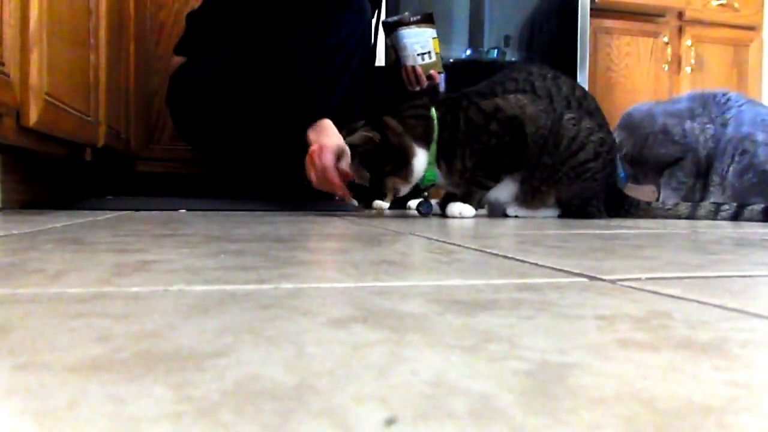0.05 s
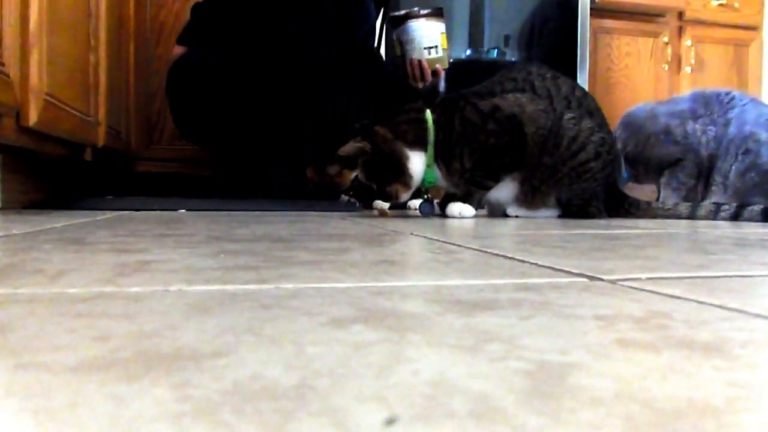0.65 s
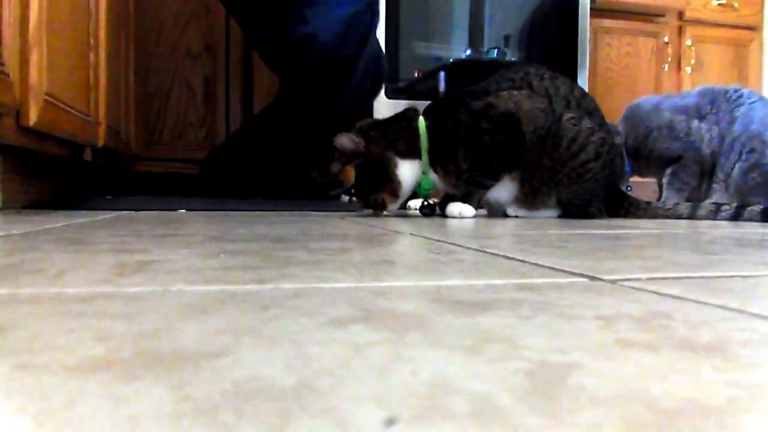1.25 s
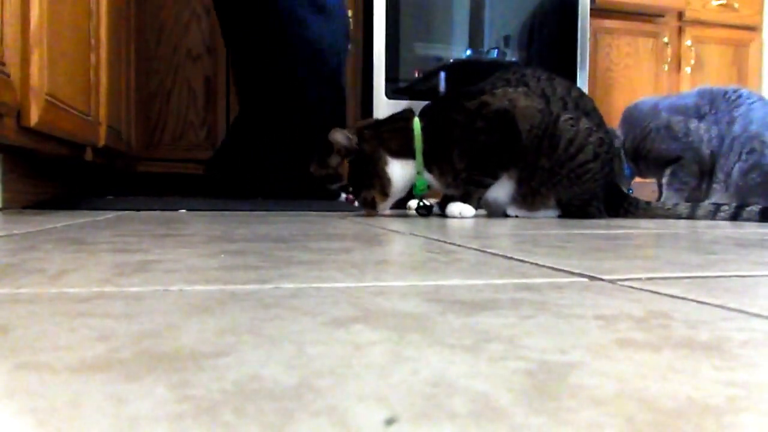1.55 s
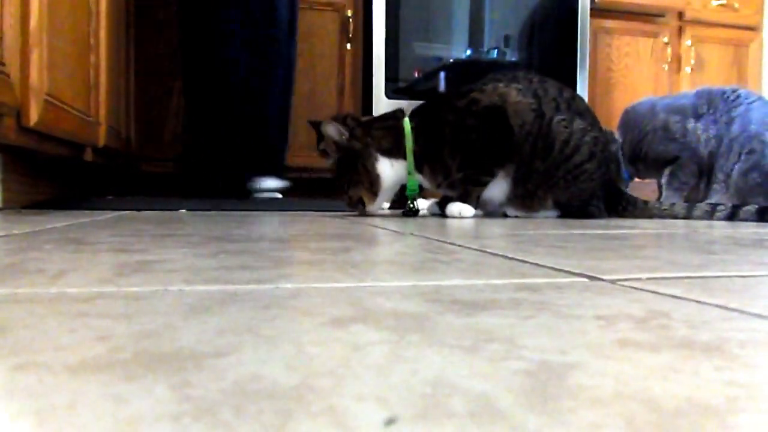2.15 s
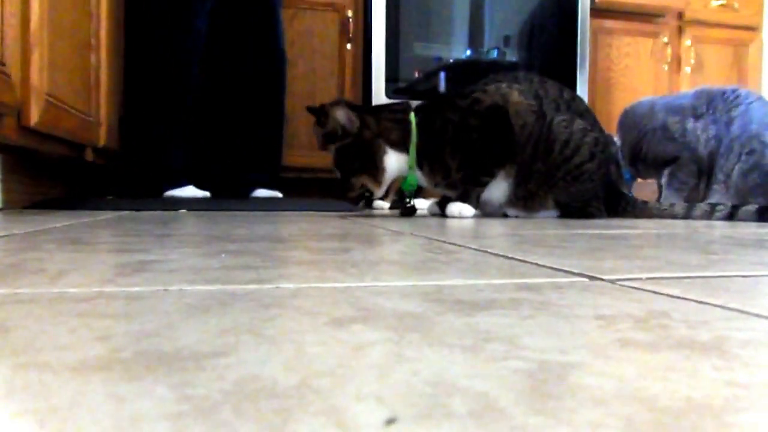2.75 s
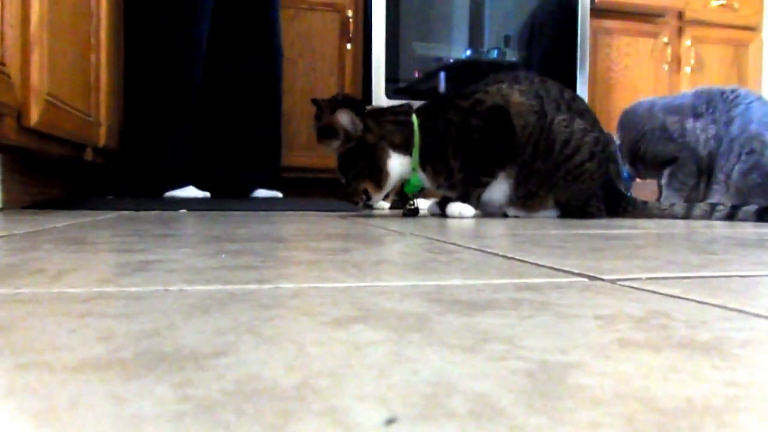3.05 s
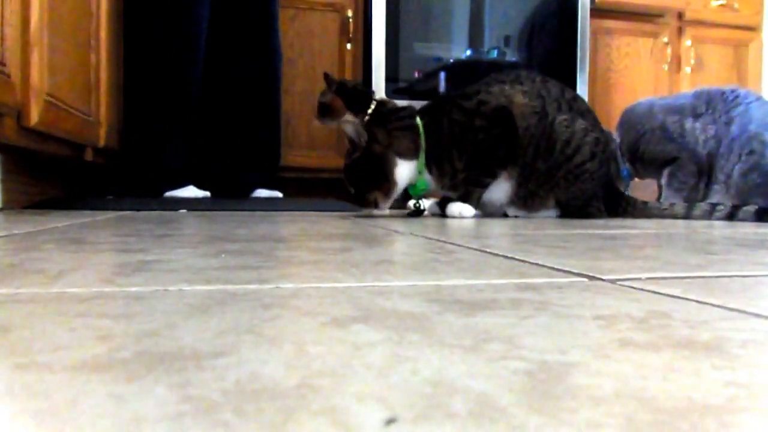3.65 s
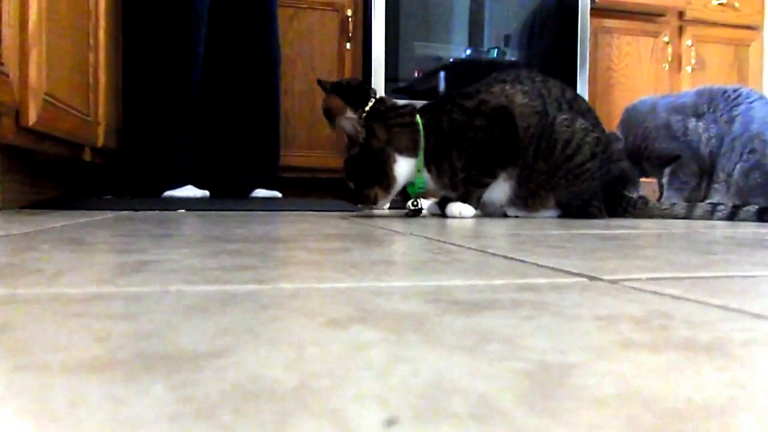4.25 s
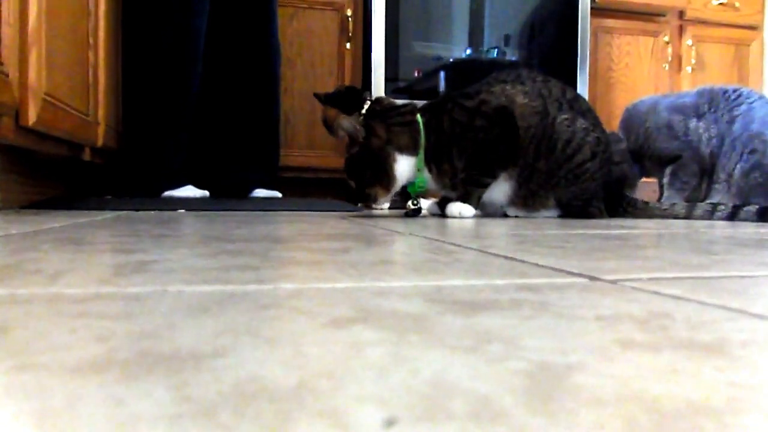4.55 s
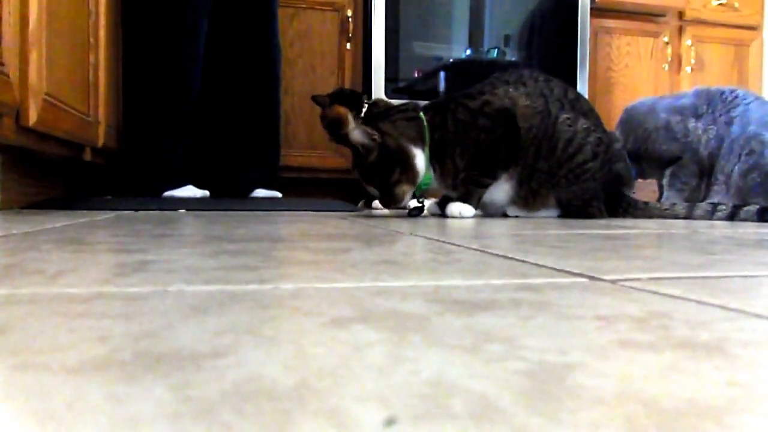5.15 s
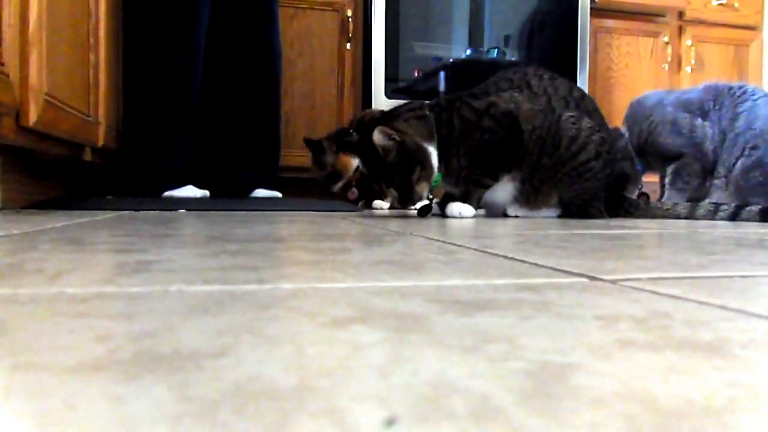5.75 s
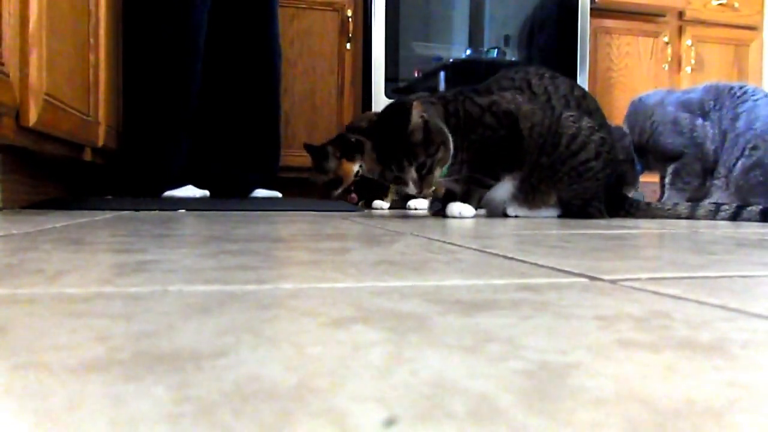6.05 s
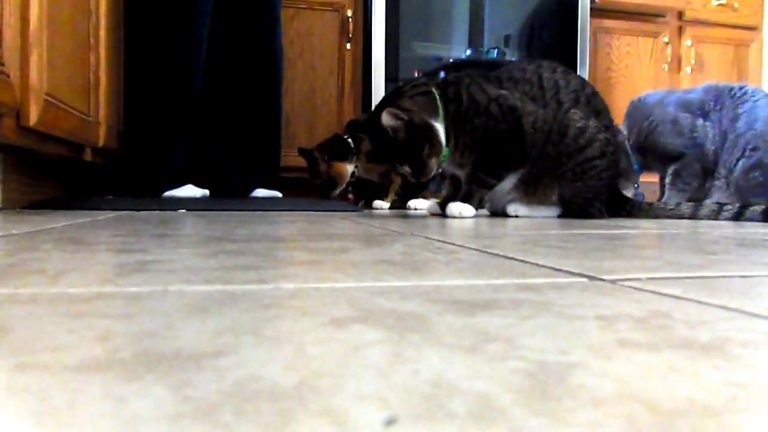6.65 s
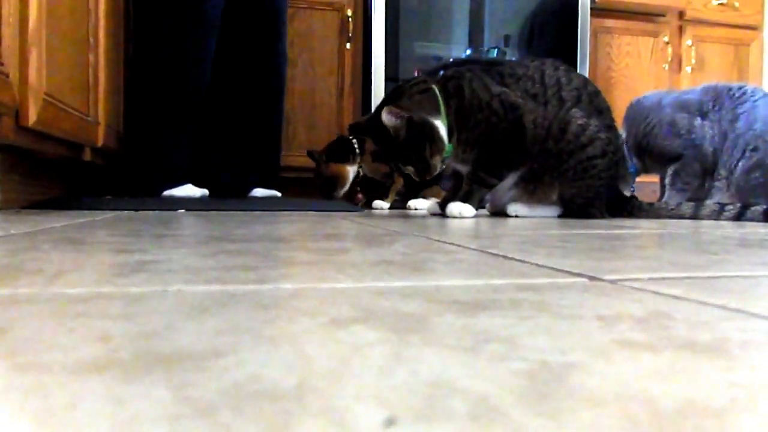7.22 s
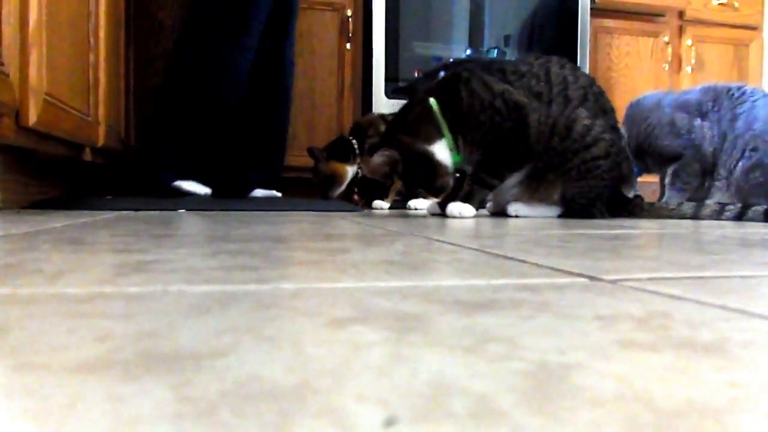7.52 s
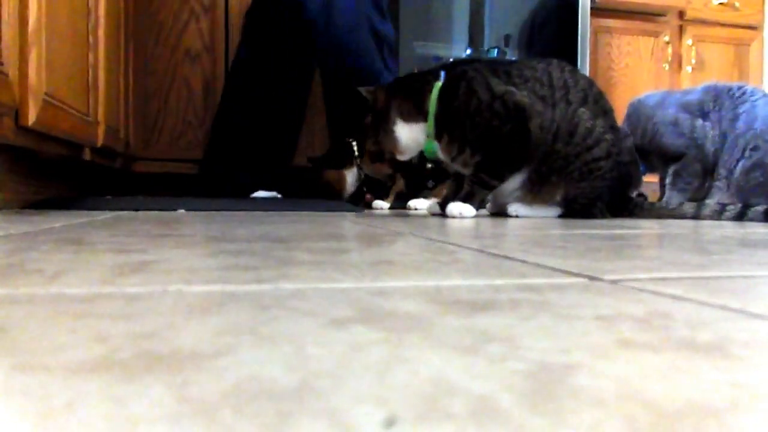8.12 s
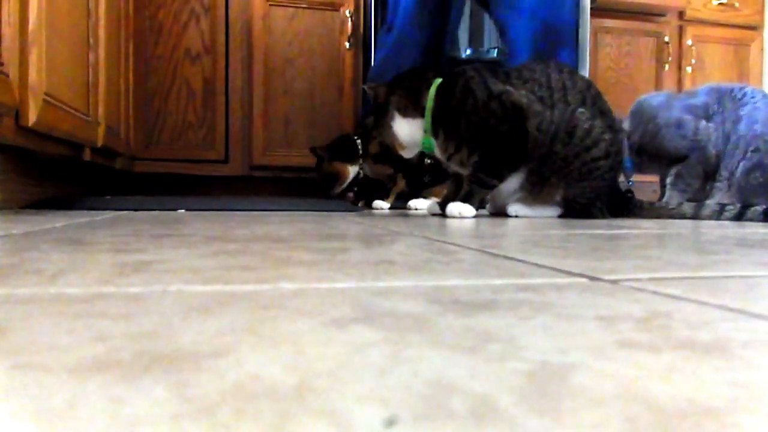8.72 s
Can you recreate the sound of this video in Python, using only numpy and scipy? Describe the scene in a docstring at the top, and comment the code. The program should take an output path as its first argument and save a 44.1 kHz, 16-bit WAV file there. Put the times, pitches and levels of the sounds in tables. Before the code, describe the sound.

A few high, damped clinks from a collar bell open the scene in a quiet kitchen. With one soft, low bump, cats start cracking dry food between their teeth, in uneven runs of brittle snaps and duller chews. The bell clinks lightly here and there, over faint fur rustle and shuffling feet. Everything is heard from a short distance, with a brief echo from the hard room.

```python
"""Cats eating kibble in a kitchen

Cats eat dry kibble off a tiled floor, a metre or two from the microphone. Each nugget
snaps between their teeth, sets jaw and mouth ringing, and echoes in the hard room.
A pellet clinks and rolls in a collar bell, paws and feet shuffle, fur and clothes rustle.
The recorder turns its treble down for a moment after the sharpest cracks."""
import sys
import numpy as np
from scipy import signal
from scipy.fft import rfft, irfft, next_fast_len
from scipy.io import wavfile
from scipy.ndimage import minimum_filter1d

SR = 44100
rng = np.random.default_rng(int(sys.argv[2]) if len(sys.argv) > 2 else 0)


def pcm_store(signal):
    """Save signal as 16-bit PCM."""
    levels = np.round(np.clip(np.atleast_2d(signal), -1, 1) * 32767)
    wavfile.write(sys.argv[1], SR, levels.astype(np.int16).T)


N = 391608
TIME = np.arange(N) / SR


def from_db(db):
    """Turn decibels into a number to multiply a sound by."""
    return 10 ** (np.asarray(db) / 20)


def rms_one(x):
    """Scale a signal so that its average strength (rms) is 1."""
    return x / np.sqrt(np.mean(x ** 2) + 1e-20)


def at_hz(points, hz):
    """Read between the rows of a table, with every octave equally wide."""
    row_hz, value = np.transpose(points)
    return np.interp(np.log(np.maximum(hz, 1)), np.log(row_hz), value)


def butter(x, hz, kind, order=2):
    """Keep the lows, the highs or a band of a sound."""
    return signal.sosfilt(signal.butter(order, hz, kind, fs=SR, output="sos"), x)


def noise(spectrum):
    """Steady noise with the tone colour given in a table, at strength 1."""
    size = next_fast_len(N)
    gain = from_db(at_hz(spectrum, np.fft.rfftfreq(size, 1 / SR)))
    return rms_one(irfft(rfft(rng.standard_normal(size)) * gain, size)[:N])


def drift(per_s):
    """A curve that wanders to a new random value per_s times a second."""
    steps = rng.standard_normal(4000)
    return rms_one(np.interp(TIME * per_s, np.arange(len(steps)), steps))


def swell(s, rise_s):
    """A smooth rise to a peak at time s, and an equal fall."""
    return np.exp(-np.minimum(np.square((TIME - s) / rise_s) * 2, 20))


def resonate(x, hz, width_hz):
    """Ring at one pitch (a resonance); the narrower its width, the longer it rings."""
    decay = np.exp(-np.pi * width_hz / SR)
    angle = 2 * np.pi * min(hz, .45 * SR) / SR
    feedback = [1, -2 * decay * np.cos(angle), decay * decay]
    return signal.lfilter(np.array([1, 0, -1]) * (1 - decay * decay) / 2, feedback, x + 1e-18)


def one_ms_energy(x):
    """Give a short sound the energy of one millisecond at strength 1."""
    return x / np.linalg.norm(x) * np.sqrt(SR / 1000)


def ring_part(force, modes, widen, pitch_spread=0.042, spread_db=3.5):
    """A push rings a group of resonances (modes), a little differently each time."""
    ring = 0
    for k, (hz, width, db) in enumerate(modes):
        pitch = hz * np.exp(pitch_spread * rng.standard_normal())
        gain = from_db(db + spread_db * rng.standard_normal())
        ring += (-1) ** k * gain * resonate(force, pitch, width * widen)
    band_hz = [0.66 * modes[0][0], min(1.38 * modes[-1][0], SR * 4 / 9)]
    return one_ms_energy(butter(ring, band_hz, "band", order=3))


def add(track, s, sound):
    """Mix a sound into a track, starting s seconds in."""
    start = max(round(s * SR), 0)
    track[start:start + len(sound)] += sound[:max(N - start, 0)]


# The colours of the rumble and the hiss. Each row: frequency in Hz, relative level in dB.
RUMBLE_COLOUR = [(20, -1), (60, 0.5), (120, -2.5), (250, -5), (400, -8.5), (800, -19), (2000, -28),
                 (5000, -28), (9000, -43), (16000, -52)]
HISS_COLOUR = [(12500, -27.5), (14200, -8), (15000, 27), (15800, -5), (16500, -24)]
def background(rumble_db=-51.5, hiss_db=-67.5):
    """The room's steady low rumble and a thin, very high hiss."""
    return from_db(rumble_db) * noise(RUMBLE_COLOUR) + from_db(hiss_db) * noise(HISS_COLOUR)


# Paws and feet shifting on the floor. Each row: time in seconds, relative level in dB.
SHUFFLE_LEVELS = [(0, -54.5), (1.3, -54), (1.6, -51), (2.8, -54), (3.9, -53), (4.8, -52.5), (6.1, -55.5),
                  (6.7, -51), (7.4, -58), (8.1, -59.5), (8.8, -53)]
# Brushes of fur and cloth. Each row: middle in seconds, relative dB of bright rustle and of dull scuff.
FUR_BRUSHES = [(0.743, -80, -51.5), (0.898, -64, -58), (1.43, -58, -74), (1.553, -52, -52),
               (2.19, -56.5, -75), (2.47, -57.5, -49.5), (2.985, -56.5, -53), (3.108, -60, -54.5),
               (4.055, -58, -54), (4.716, -72, -46), (4.877, -59, -56.5), (6.598, -61.5, -43),
               (7.06, -58.5, -65), (8.812, -61, -96)]
# The colours of shuffle and rustle. Each row: frequency in Hz, relative level in dB.
SHUFFLE_COLOUR = [(200, -1.5), (450, 2), (900, 1), (1500, -3.5), (2400, -8.5), (4500, -9.5), (6500, -14),
                  (9000, -17)]
RUSTLE_COLOUR = [(2500, -38), (5000, 5), (7500, 0.5), (10000, 2.5), (13000, -5), (16000, 0)]
def movement(shuffle_db=-1.5, rustle_db=-65, brush_db=3.5, scuff_db=-1, grain_db=3.5):
    """Paws and feet shuffle dully; fur and cloth give a grainy rustle that swells in short brushes."""
    shuffle = from_db(np.interp(TIME, *np.transpose(SHUFFLE_LEVELS)) + shuffle_db)
    brushes, scuffs = sum(from_db([[bright], [dull]]) * swell(s, rise_s=0.086)
                          for s, bright, dull in FUR_BRUSHES)
    grain = from_db(grain_db * drift(per_s=300))
    dull = np.hypot(shuffle * from_db(drift(per_s=35)), from_db(scuff_db) * scuffs * grain)
    bright = np.hypot(from_db(rustle_db), from_db(brush_db) * brushes * grain)
    return dull * noise(SHUFFLE_COLOUR) + bright * noise(RUSTLE_COLOUR)


# The collar swings as the head moves. Each row: start and end in seconds, pitch in Hz, relative dB.
COLLAR_SWINGS = [(0.026, 0.52, 5430, -43), (0.146, 1.1, 4420, -48), (6.764, 7.12, 5480, -56),
                 (7.8, 8.717, 5700, -50)]
def light_touches(clinks, per_swing=7, bounce_s=0.016, bounce_loss_db=14, shine_db=-22):
    """List fainter clinks: the pellet bounces after each clear one and grazes the bell in each swing."""
    touches = [(s + bounce_s, hz, db - bounce_loss_db, shine_db) for s, hz, db, _ in clinks]
    for start, end, hz, db in COLLAR_SWINGS:
        for k in range(per_swing):
            s = start + (end - start) * (k + rng.random()) / per_swing
            pitch = hz * np.exp(0.033 * rng.standard_normal())
            touches.append((s, pitch, db + 4 * rng.standard_normal(), shine_db))
    return touches


# Clear clinks. Each row: start in seconds, pitch in Hz, relative level in dB, dB of shine on top.
BELL_CLINKS = [(0.025, 4365, -23, -3), (0.258, 5820, -37, -15), (0.308, 4330, -41, 11.5),
               (0.697, 4350, -33, -8.5), (0.941, 4300, -43.5, -19.5), (1.808, 5080, -43, -19),
               (2.474, 5105, -36.5, -2), (2.55, 5100, -47, -22), (4.049, 5900, -40, -22),
               (6.872, 5810, -43, -26), (7.408, 5150, -40.5, -31), (8.011, 5830, -45, -27)]
# The bell's own notes. Each row: pitch in Hz, relative level of the lasting ring in dB.
BELL_MODES = [(4330, -42), (5080, 2), (5800, -27)]
# Its overtones. Each row: pitch in Hz, relative level in dB, seconds to fade by 60 dB (called t60).
BELL_OVERTONES = [(10240, -9.5, 0.084), (10600, -22, .04), (12160, -34, 0.073), (15700, 2, .016)]
def collar_bell(damped_t60=0.024, ring_t60=0.059, touch_s=0.00027, tick_db=-9, tick_s=0.0048, gain_db=1):
    """The pellet strikes the bell with a tick; fur damps most of the note and a faint ring stays."""
    t, out = TIME[:SR // 4], np.zeros(N)
    onset = 1 - np.exp(-t / touch_s)

    def tone(hz, t60):
        return np.sin(2 * np.pi * (hz * t + rng.random())) * from_db(-60 * t / t60)

    for s, hz, level_db, shine_db in BELL_CLINKS + light_touches(BELL_CLINKS):
        note = tone(hz * (1 + 0.0042 * rng.standard_normal()), damped_t60)
        ring = from_db(at_hz(BELL_MODES, hz)) * tone(hz, ring_t60)
        tick = from_db(tick_db) * butter(rng.standard_normal(len(t)), 4900, "high") * np.exp(-t / tick_s)
        shine = tick + sum(from_db(db) * tone(f, t60) for f, db, t60 in BELL_OVERTONES)
        add(out, s, from_db(level_db) * (note + ring + from_db(shine_db) * shine) * onset)
    return from_db(gain_db) * out


# Rolls inside the bell. Each row: middle in seconds, rise time in seconds, relative level in dB.
PELLET_ROLLS = [(0.176, 0.027, -54.5), (0.294, 0.098, -54.5), (2.504, 0.052, -59)]
def rolling_pellet(taps_per_s=500, width_hz=170, overtone_db=-5, gain_db=6):
    """The rolling pellet taps the bell's shell hundreds of times a second."""
    taps = (rng.random(N) < taps_per_s / SR) * rng.standard_normal(N)
    shell = sum(from_db(db / 4) * resonate(taps, hz, width_hz) for hz, db in BELL_MODES)
    overtone = resonate(taps, BELL_OVERTONES[2][0], width_hz) / np.std(shell) / 2
    ring = butter(rms_one(shell) + from_db(overtone_db) * overtone, 4300, "high")
    return ring * sum(from_db(db + gain_db) * swell(s, rise_s) for s, rise_s, db in PELLET_ROLLS)


# Resonances of the mouth, the nugget's snap and its brighter crack.
# Each row: pitch in Hz, width in Hz, relative level in dB.
MOUTH_MODES = [(940, 426, -1.5), (1390, 440, 0), (1940, 960, -6.5)]
SNAP_MODES = [(2730, 1360, -5.5), (3680, 1080, -1.5), (5120, 1030, 3.5), (6240, 1120, -5.5)]
CRACK_MODES = [(8390, 2260, 0), (10540, 1260, -0.5), (12500, 5300, -6.5), (15640, 1000, -9.5)]
def chewing(per_s=14, level_db=-34, spread_db=4):
    """Tiny crumbs and wet ticks of the tongue come at random moments."""
    ticks = (rng.random(N) < per_s / SR) * from_db(spread_db * np.clip(rng.standard_normal(N), -2, 1.5))
    skipped = rng.integers(0, 3, N)  # each tick rings two of the three groups
    return from_db(level_db) * sum(from_db(db) * resonate(ticks * (skipped != k), hz, width)
                                   for k, modes in enumerate((MOUTH_MODES, SNAP_MODES, CRACK_MODES))
                                   for hz, width, db in modes)


SOFT_RUN_S, BRITTLE_RUN_S = 0.0012, 0.00018  # how long a crack takes to run through a nugget
def fracture(t, run_s, crumbs_per_s=330, crumb_db=-15, crumble_s=0.023):
    """A crack runs through a nugget and a few crumbs break after it. Returns both."""
    crack = rng.standard_normal(len(t)) * np.exp(-t / run_s)
    crumbs = (rng.random(len(t)) < crumbs_per_s / SR) * rng.standard_normal(len(t))
    return crack / np.linalg.norm(crack), from_db(crumb_db) * crumbs * np.exp(-t / crumble_s)


# Resonances of a low thud. Each row: pitch in Hz, width in Hz, relative level in dB.
THUD_MODES = [(232, 88, 1.5), (500, 960, -2.5)]
# The bites. Each row: start in seconds, jaw force and nugget snap in relative dB,
# brittleness from 0 (soft) to 1, pitch of the nugget in Hz.
KIBBLE_BITES = [(0.7801, -57, -45.5, 0.5, 5200.0), (1.4829, -26, -31.5, 0.53, 4370),
                (1.5969, -23.5, -26, 0.38, 3500.0), (1.6334, -29, -30, 0.5, 4550),
                (1.7193, -35.5, -44.0, 0.2, 3300.0), (1.7469, -27, -31.5, 0.77, 3960),
                (1.8277, -25, -15.5, 0.78, 5360), (1.9085, -26, -33, 0.6, 4200.0),
                (1.92, -30, -28, 0.3, 4600), (2.0312, -29.5, -29, 0.67, 5300.0),
                (2.246, -39, -41, 0.5, 3820), (2.2723, -34.5, -39, 0.56, 4150),
                (2.8455, -31, -36, 0.59, 3960), (2.9879, -39.5, -52, 0.64, 4800.0),
                (3.491, -32.5, -25.5, 0.65, 4300), (3.6454, -28.5, -38, 0.1, 3700.0),
                (3.6532, -44, -36.5, 0.1, 3800.0), (4.1819, -28, -31.0, 0.35, 4200.0),
                (4.1983, -31, -29.5, 0.6, 4530), (4.2775, -36.5, -41.5, 0, 4100.0),
                (4.3524, -37, -34, 0.81, 4900), (4.4314, -61, -42.5, 0.2, 3720),
                (4.613, -55, -44.5, 0.7, 4300.0), (4.6623, -39, -41.5, 0.64, 4600),
                (4.689, -30.5, -29, 0.0, 4830), (4.9797, -38, -57.5, 0.8, 3000.0),
                (5.1572, -37.5, -49, 0.3, 4000.0), (5.2429, -28.5, -28.5, 0.55, 4430),
                (5.3047, -33, -46, 0.31, 3800.0), (5.3659, -31, -29, 0.6, 4350),
                (5.4191, -24.5, -25.5, 0.36, 3920), (5.636, -32.5, -39.5, 0.82, 4800.0),
                (5.782, -31.5, -50, 0.83, 4400.0), (5.799, -33, -23, 0.93, 5220),
                (6.1925, -30, -23, 0.6, 4370), (6.2808, -34, -24, 0.78, 5000.0),
                (6.5191, -31, -33, 0.52, 4440), (6.654, -26, -27, 0.45, 4780),
                (6.7782, -36.0, -37, 0.61, 4000.0), (7.0034, -41.5, -51, 0.92, 3700.0),
                (7.1264, -32, -52, 0.2, 4220), (7.1414, -29, -30, 0.48, 4030),
                (7.209, -35.5, -30, 0.85, 4780), (7.6937, -40.5, -36, 0.19, 4080),
                (8.213, -38.5, -32, 0.5, 4320), (8.3017, -48.0, -41, 0, 4440),
                (8.647, -44, -47.5, 0.96, 5600.0)]
def bites(usual_nugget_hz=4556):
    """Each break rings jaw, mouth and nugget. Returns the direct sound and what goes into the room."""
    t, direct, to_room = TIME[:SR // 12], np.zeros(N), np.zeros(N)
    for s, jaw_db, nugget_db, brittle, nugget_hz in KIBBLE_BITES:
        # a smaller piece rings higher
        snap = [(hz * nugget_hz / usual_nugget_hz, width, db) for hz, width, db in SNAP_MODES]
        parts = [(THUD_MODES, jaw_db - 5.5 - 6 * brittle),  # a soft nugget lets the jaw thud home
                 (MOUTH_MODES, jaw_db),
                 (snap, nugget_db + 2.27),
                 (CRACK_MODES, nugget_db - 29 + 39.5 * brittle)]  # a brittle one cracks brightly
        room_db = -1.5 - 0.5 * brittle
        crack, crumbs = fracture(t, np.interp(brittle, [0, 1], [SOFT_RUN_S, BRITTLE_RUN_S]))
        for modes, db in parts:
            add(direct, s, from_db(db) * ring_part(crack + crumbs, modes, widen=0.54))
            # the room gathers sound from all directions, so its colour is smoother
            add(to_room, s, from_db(db + room_db) * ring_part((t == 0) + crumbs, modes, widen=2.06))
    return direct, to_room


# Resonances of the closing jaw. Each row: pitch in Hz, width in Hz, relative level in dB.
TOCK_MODES = [(906, 55, -5.5), (1348, 97, -3.5)]
def jaws(grind_s=0.0076, grind_db=-14, tock_db=-6):
    """The teeth grind briefly before the nugget gives, then the jaw closes with a hollow tock."""
    t, out = TIME[:SR // 12], np.zeros(N)
    for s, jaw_db, *_ in KIBBLE_BITES:
        grind = rng.standard_normal(len(t)) * (t < grind_s)
        add(out, s - grind_s, from_db(jaw_db + grind_db) * ring_part(grind, MOUTH_MODES, widen=1))
        add(out, s, from_db(jaw_db + tock_db) * ring_part(t == 0, TOCK_MODES, widen=1, spread_db=7.5))
    return out


def break_clicks(soft_top_hz=2460, brittle_top_hz=14000):
    """Each break also gives a bare click with no ring; brittle nuggets click higher and louder."""
    t, out = TIME[:SR // 12], np.zeros(N)
    for s, _, nugget_db, brittle, _ in KIBBLE_BITES:
        top_hz = soft_top_hz * (brittle_top_hz / soft_top_hz) ** brittle
        _, crumbs = fracture(t, SOFT_RUN_S)
        click = butter(butter((t == 0) + crumbs, 1400, "high"), top_hz, "low")
        level_db = nugget_db - 18.5 + 9.5 * brittle
        add(out, s, from_db(level_db) * one_ms_energy(click))
    return out


def knock(start_s=1.485, level_db=-27):
    """One soft, low bump as someone gets up."""
    t, out = TIME[:SR // 12], np.zeros(N)
    add(out, start_s, from_db(level_db) * ring_part(t == 0, THUD_MODES, widen=0.87))
    return out


# How long the echo lasts. Each row: frequency in Hz, seconds to fade by 60 dB.
ECHO_T60 = [(200, .5), (600, 0.34), (1400, 0.34), (3700, 0.42), (7000, 0.46), (10000, 0.09), (15000, 0.9)]
# The echo's colour. Each row: frequency in Hz, level in dB.
ECHO_COLOUR = [(200, 0), (550, 4), (900, -2.5), (1300, -1.5), (2500, 5.5), (3700, 1.5), (5000, -4.5),
               (7000, 0), (10000, -0.5), (15000, -8.5)]
def kitchen_echo(x, gap_s=0.001, build_s=0.0021):
    """Reflections from tiles and cabinets build up quickly; each band fades at its own speed."""
    t = TIME[:SR * 3 // 5]
    edges_hz = np.geomspace(100, 18000, 16)
    build_up = 1 - np.exp(-np.maximum(t - gap_s, 0) / build_s)
    white, echo = rng.standard_normal((2, len(t))), 0
    for k, (low, high) in enumerate(zip(edges_hz, edges_hz[1:])):
        hz = np.sqrt(low * high)
        fade = from_db(-60 * t / at_hz(ECHO_T60, hz)) * build_up
        band = butter(white[k % 2], [low, high], "band") * fade / np.linalg.norm(fade)
        echo += band * from_db(at_hz(ECHO_COLOUR, hz))
    return signal.fftconvolve(x, echo)[:N]


def scene(bell_room_db=-6):
    """Eating and the bell echo in the kitchen, over movement, rumble and hiss."""
    crunches, to_room = bites()
    contacts = chewing() + jaws() + break_clicks() + knock()
    clinks = collar_bell() + rolling_pellet()
    echo = kitchen_echo(to_room + contacts + from_db(bell_room_db) * clinks)
    return (crunches + contacts + clinks + echo + background() + movement())[None]


def treble_limiter(x, threshold_db=-19, depth_db=3.5, hold_s=0.31, release_db_per_s=9, attack_s=0.06):
    """A sharp crack turns down everything above the bass; the level holds, then creeps back."""
    treble_db = 20 * np.log10(np.abs(butter(x, 7830, "high")) + 1e-9)
    cut_db = np.clip(2 * (treble_db - threshold_db), 0, depth_db)
    half_hold = int(hold_s * SR) // 2
    held_db = -minimum_filter1d(-cut_db, 2 * half_hold + 1, origin=half_hold, mode="constant")
    released_db = np.maximum.accumulate(held_db + release_db_per_s * TIME) - release_db_per_s * TIME
    lag = np.exp(-1 / (attack_s * SR))
    smooth_db = signal.lfilter([1 - lag], [1, -lag], released_db)
    bass = butter(x, 450, "low", order=1)
    return bass + (x - bass) * from_db(-smooth_db)


def record(dry, notch_hz=7830, notch_width_hz=700, top_hz=16000):
    """The microphone misses one narrow band; then the limiter acts and the highest treble is cut."""
    notched = signal.lfilter(*signal.iirnotch(notch_hz, notch_hz / notch_width_hz, fs=SR), dry[0])
    top_cut = signal.ellip(10, .3, 80, top_hz, fs=SR, output="sos")
    return signal.sosfilt(top_cut, treble_limiter(notched))[None]


dry = scene()
out = record(dry)
pcm_store(out)
```